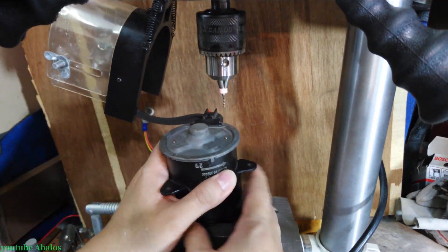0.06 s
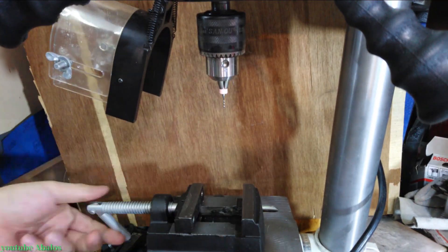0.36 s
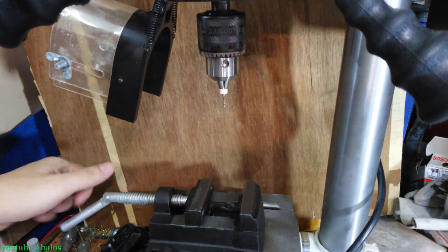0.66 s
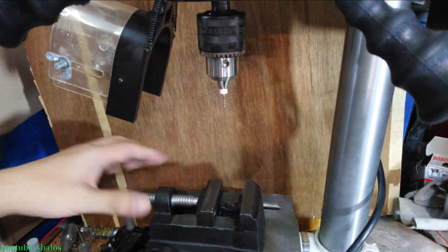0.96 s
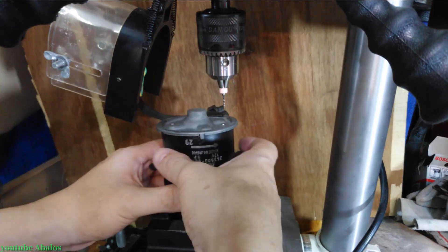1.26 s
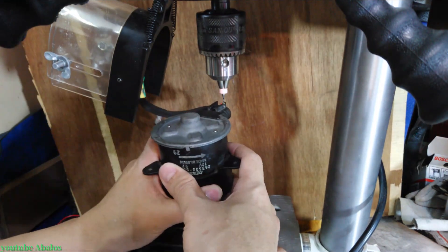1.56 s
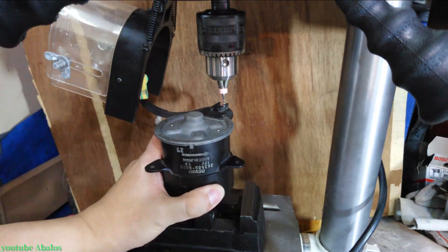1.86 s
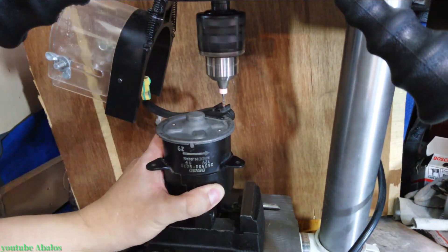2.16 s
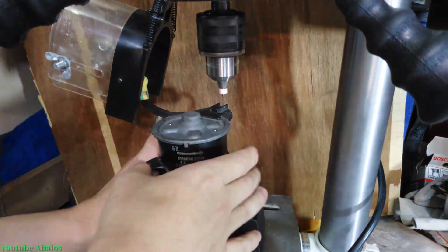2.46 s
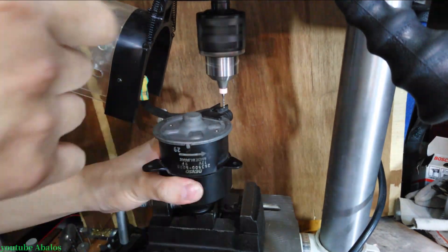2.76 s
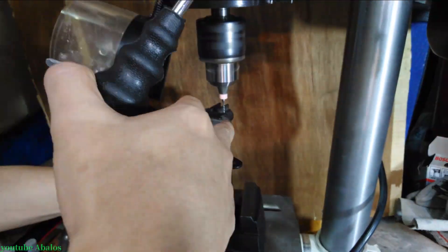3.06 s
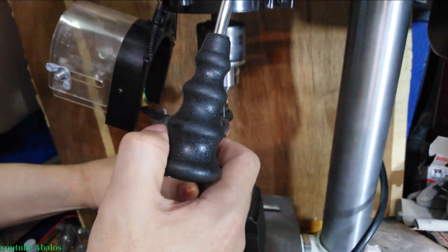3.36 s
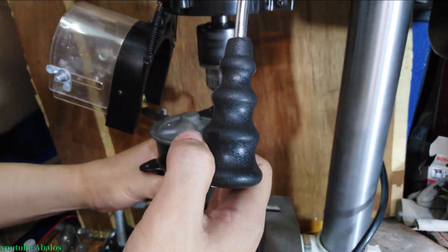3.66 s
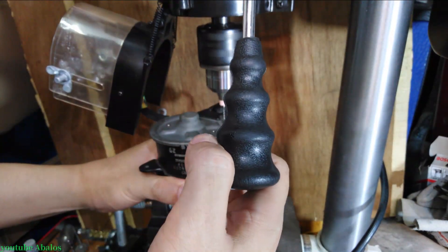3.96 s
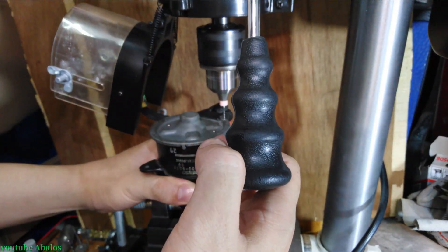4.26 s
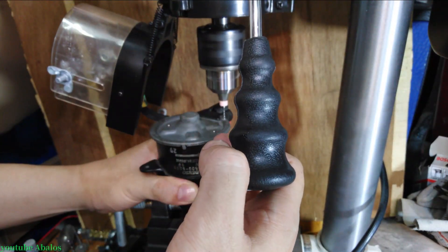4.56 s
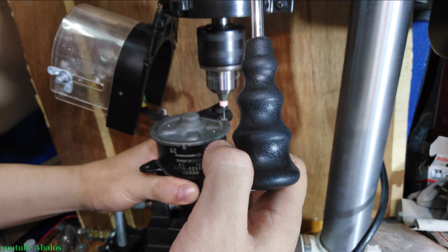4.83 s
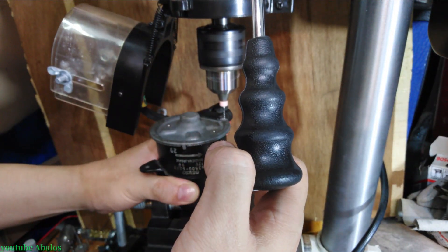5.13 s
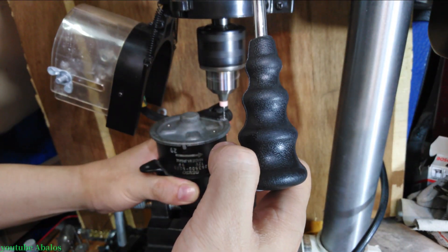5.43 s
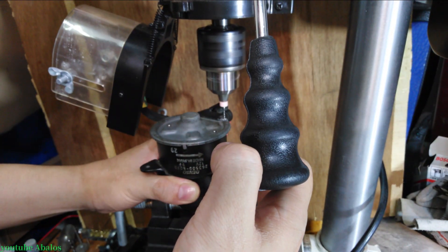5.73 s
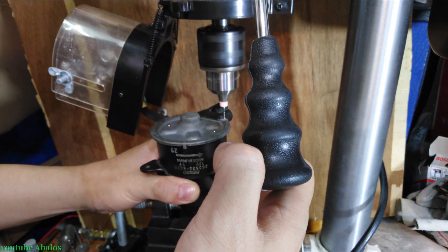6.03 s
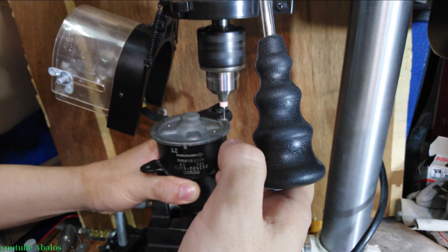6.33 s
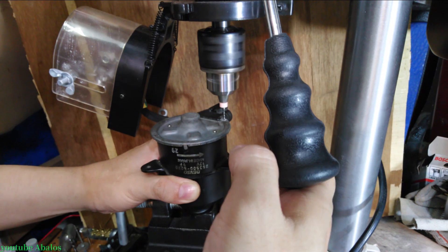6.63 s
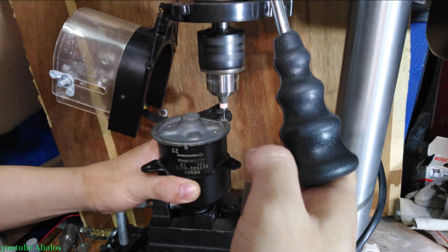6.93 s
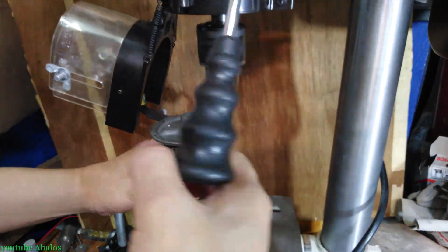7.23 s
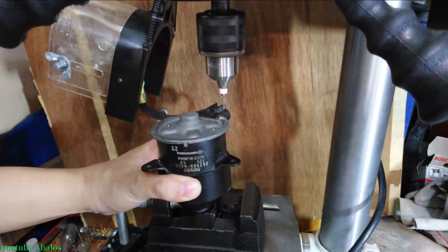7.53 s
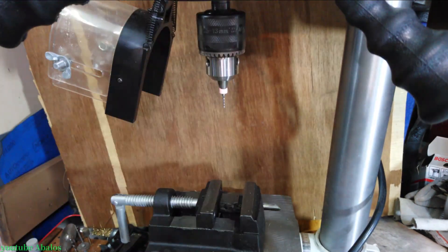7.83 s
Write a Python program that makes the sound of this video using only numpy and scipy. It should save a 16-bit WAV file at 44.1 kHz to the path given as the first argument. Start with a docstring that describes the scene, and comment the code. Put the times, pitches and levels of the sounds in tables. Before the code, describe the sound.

A cooling fan hums steadily over rushing air and a thin electrical whine in a small workshop, heard through a close stereo microphone. For the first 1.4 seconds, hands position a vice and a metal housing with light knocks, clicks and short scrapes, the strongest knock at about 0.6 seconds. At 2.2 seconds a bench drill press starts abruptly, its drive and gears whining while a loose spindle rattles. The bit grinds into the housing with a harsh, ringing chatter and a bright hiss, growing somewhat stronger as it goes. The cutting edge bites harder around 3.2 seconds and between 4.3 and 5.7. The bit catches briefly several times, loudest near 7.2 seconds, followed by a momentary dip. At about 7.6 seconds the switch clicks off and the gears brake with a quick, rough falling tone. The fan and thin whine remain until the end, around 8 seconds.

```python
"""A bench drill press, close to a stereo microphone in a small workshop. It starts with a whine of
drive and gears, rattles harshly while the bit grinds into a motor housing, catches a few times,
clicks off and brakes to a stop. Rubbing and a loose spindle ring its parts; the cutting edge hisses.
Beforehand, hands set the vice and housing in place with knocks and scrapes. Behind it all, a
cooling fan hums over rushing air and a thin electrical whine holds on."""
import sys
import numpy as np
from scipy import signal
from scipy.fft import rfft, irfft, next_fast_len
from scipy.io import wavfile
from scipy.ndimage import map_coordinates

SR = 44100
rng = np.random.default_rng(int(sys.argv[2]) if len(sys.argv) > 2 else 0)


def store_pcm(level_fs):
    """Save levels as 16-bit WAV."""
    pcm = np.round(np.clip(level_fs, -1, 1) * 32767).astype(np.int16)
    wavfile.write(sys.argv[1], SR, np.atleast_2d(pcm).T)


N = 356851
TIME, HZ = np.arange(N) / SR, np.fft.rfftfreq(N, 1 / SR)
START_S, DUCK_S, STOP_S = 2.19, 7.17, 7.578
SPINDLE_HZ, BEARING_HZ, WHINE_HZ = 41.687, 115.4, 750.37

# modes of the head (4 rows), bit and housing (2), chuck collar (2), cutting edge (3) and tip (4):
# f/Hz, width/Hz, level/dB
DRILL_MODES = [(1225, 273, -0.5), (1665, 230, 0), (1826, 220, 1), (2092, 203, 0), (2593, 250, -4.5),
               (2850, 300, -1), (3370, 95, -21), (3534, 560, -8), (4560, 630, -12), (5280, 1470, -11),
               (6980, 960, -16), (7910, 720, -12), (9750, 1450, -13.5), (12400, 3400, -16.5),
               (15300, 820, -17)]
# the drilling follows the load on the bit, and ducks briefly after the loudest catch: t/s, level/dB
DRILLING_LEVEL = [(2.25, -33), (2.38, -33), (2.81, -34), (3.0, -30), (3.71, -33.5), (3.83, -31),
                  (4.01, -33.5), (4.69, -29), (4.72, -32), (5.39, -29.5), (5.87, -33.5), (5.9, -31.5),
                  (6.69, -29.5), (7.13, -30), (7.16, -26), (7.19, -41.5), (7.29, -32), (7.56, -36.5)]
# the cutting edge bites harder: t/s, length/s, level/dB
EDGE_BITES = [(3.04, 0.11, -39), (3.17, .09, -34.5), (3.32, 0.097, -34), (4.28, 0.1, -39),
              (4.52, 0.088, -32.5), (4.67, 0.27, -40), (5.18, 0.17, -34.5), (5.4, 0.061, -34.5),
              (5.72, 0.092, -34), (6.73, .07, -46)]
# the bit catches: t/s, length/s, level/dB
BIT_CATCHES = [(2.895, .014, -29), (4.52, .012, -30), (4.705, .02, -29), (5.503, .012, -25),
               (6.967, .01, -28), (7.063, .012, -27), (7.16, .022, -22), (7.29, .02, -28)]
# ring of the loose spindle: f/Hz, level/dB, t60/s
SPINDLE_MODES = [(1190, -2, .04), (1255, -5, .035), (1680, -5, .03), (1905, 0, .036)]
# tones of the drive under power: multiple of WHINE_HZ, level/dB
WHINE_HARMONICS = [(1, -32), (2, -38), (3, -41), (4, -44.5), (6, -46), (10, -52.5)]
# tones of the gearing: multiple of SPINDLE_HZ, level/dB
GEAR_TONES = [(26, -53), (28, -45), (29, -46), (30, -45), (31, -52), (39, -50), (40, -49), (43, -49),
              (44, -51), (45, -44), (46, -47), (47, -48), (50, -51), (71, -53), (80, -52), (81, -45),
              (82, -49), (83, -50), (86, -50), (90, -48)]
# thin high tones of the motor: f/Hz, level/dB
MOTOR_TONES = [(6342, -60), (7093, -54), (7253, -57), (7843, -48), (9344, -54), (10094, -52), (11595, -61),
               (12345, -55), (13846, -58)]
# the gears run down: t/s, f/Hz, level/dB
GEAR_FALL = [(7.585, 2700, -41), (7.61, 2400, -39), (7.65, 1800, -37), (7.685, 1300, -44), (7.75, 800, -60)]
# metal parts knock on the bench; last, the drill's switch clicks off:
# t/s, snap level/dB, snap f/Hz, snap t60/s, thud level/dB
KNOCKS_AND_CLICK = [(0.0494, -20.5, 3150, 0.028, -53), (.2415, -35, 9000, .008, -60),
                    (0.457, -26.5, 9000, .012, -55), (0.5162, -27, 9000, .01, -55),
                    (0.5622, -16, 10900, 0.0094, -15), (0.662, -24, 6040, 0.011, -45),
                    (.861, -26, 11000, .01, -55), (1.262, -27, 13000, .02, -70),
                    (1.385, -29, 5000, .012, -34), (7.571, -24.5, 7400, 0.03, -65)]
# ring of the vice: f/Hz, level/dB, t60/s
VICE_MODES = [(700, 0.5, 0.04), (1020, -8.5, 0.029), (1250, -1.5, 0.018), (1620, -6.5, 0.018),
              (2440, -5, 0.012), (2950, 0.5, 0.015), (6570, -22, .014), (8796, -22, .018)]
# the vice screw and fingers scrape: t/s, length/s, body level/dB, hiss level/dB
SCRAPE_STROKES = [(0.134, 0.088, -45, -48), (0.467, 0.12, -39.5, -45), (0.521, .05, -35.5, -38),
                  (0.557, 0.017, -32, -46), (0.665, 0.11, -39.5, -57), (0.802, .125, -38.5, -44),
                  (0.875, 0.062, -40, -40), (.93, 0.083, -38, -42), (1.003, 0.078, -38, -44),
                  (1.272, 0.034, -65, -42), (1.373, 0.037, -62, -37)]
# spectra of a scrape's body and hiss: f/Hz, level/dB
SCRAPE_BODY_SPECTRUM = [(300, -25), (900, 0), (1600, 6.5), (3000, 2.5), (4000, -10), (6000, -2.5),
                        (9000, -21), (16000, -30)]
SCRAPE_HISS_SPECTRUM = [(2000, -21), (6000, -10), (8500, -5.5), (12000, -2.5), (16000, -18)]
# the fan's main tones, weaker tones and casing modes: f/Hz, width/Hz, level/dB
BLADE_TONES = [(422.1, 5, -43.5), (415.5, 0.62, -51.5), (628.3, 11, -38.5)]
WEAK_FAN_TONES = [(502.6, 35, -51.5), (563, 15, -48.5), (655, 30, -44.5), (843, 9, -55.5), (979, 30, -66.5),
                  (1274, 15, -52.5)]
CASING_MODES = [(2190, 42, -0.5), (2940, 22, -5), (3044, 48, 2), (3980, 140, 0), (4600, 160, 0.5),
                (5130, 280, -10)]
# the fan's rush of air: f/Hz, level/dB
AIR_SPECTRUM = [(30, -31), (130, -31.5), (250, -24), (390, -3.5), (660, -4), (860, -11), (1250, -8.5),
                (1600, -17), (2400, -19), (3600, -16.5), (4700, -15), (5900, -19), (9000, -21.5),
                (15800, -24.5)]
# stereo width at the microphone: f/Hz, side minus mid/dB
MIC_WIDTH = [(150, -4), (380, -20), (700, -22.5), (1300, -14.5), (2400, -14.5), (4400, -4), (8000, -2.5),
             (15000, 2.5)]
# balance at the microphone: f/Hz, left minus right/dB
MIC_BALANCE = [(500, -0.5), (1000, 0.2), (2500, 2.5), (8000, 0.83), (12000, 0)]


def drilling(deepen_db_per_s=0.88, soften_db=1, rattle_follow=0.098, hiss_follow=0.41):
    """Close up, gear contacts ring the head and chuck; the cut rings bit and housing and hisses."""
    head, bit, collar = DRILL_MODES[:4], DRILL_MODES[4:6], DRILL_MODES[6:8]
    edge, tip = DRILL_MODES[8:11], DRILL_MODES[11:]
    swing_db = drilling_swing_db()
    rub = rubbing(depth_db=1.0, jolt_db=1.5, grit_per_s=1800, grit_db=2.5, grit_share=0.29)
    cut = rubbing(depth_db=2.0, jolt_db=1.06, grit_per_s=1400, grit_db=5.5, grit_share=0.36)
    grind = 0.5 * rub + cut
    shaken_rub = rub * (1 + 0.45 * bearing_jolts(decay_s=0.0015))
    rattle = colour(shaken_rub, resonances(head)) + 0.66 * spindle_clatter()
    rattle *= amp(-32 + rattle_follow * swing_db + 0.5 * drift(12))
    # the chatter grows as the hole deepens and is slightly softer after the duck
    chatter_db = swing_db + deepen_db_per_s * (TIME - START_S) - soften_db * (TIME > DUCK_S)
    chatter = amp(-37.5 + chatter_db) * colour(rub, resonances(bit))
    chuck = amp(-38.5 + swing_db / 2) * colour(rub, resonances(collar))
    cutting = amp(-38 + swing_db) * colour(grind, resonances(edge))
    hiss = amp(-41 + hiss_follow * swing_db) * colour(grind, resonances(tip))
    bites = amp(-0.5) * swells(EDGE_BITES) * colour(noise(), resonances(edge[:2]))
    catches = swells(BIT_CATCHES) * colour(noise(), resonances(DRILL_MODES[1:]))
    body = (rattle + chatter + chuck) * powered(coast_s=0.1)
    treble = (cutting + hiss) * powered(coast_s=0.21)
    return body + treble + bites + catches + bearing_ticks(swing_db)


def drilling_swing_db(unsteady_db=0.46):
    """Drilling level around its usual value; the hand on the feed lever is never quite steady."""
    s, db = np.transpose(DRILLING_LEVEL)
    return np.interp(TIME, s, db - np.median(db)) + unsteady_db * drift(9)


def rubbing(depth_db, jolt_db, grit_per_s, grit_db, grit_share, spot_count=22):
    """Metal rubs over the same high spots every turn, with sharp grains of grit on top."""
    spots = unit(rng.standard_normal(spot_count))
    profile = np.interp(TIME * SPINDLE_HZ, np.arange(spot_count) / spot_count, spots, period=1)
    pressure = amp(depth_db * profile + jolt_db * drift(260))
    grains = (rng.random(N) < grit_per_s / SR) * amp(grit_db * np.minimum(rng.exponential(1, N), 4))
    grit = unit(grains * rng.choice([-1, 1], (2, N)))
    return pressure * (np.sqrt(1 - grit_share) * noise() + np.sqrt(grit_share) * grit)


def spindle_clatter(spread_db=5.0, limp_db=4.0, jitter_s=0.001203):
    """The loose spindle knocks once a turn, harder every second turn, ringing its modes unevenly."""
    turns, t = np.arange(int(TIME[-1] * SPINDLE_HZ)), np.arange(4000) / SR
    out = np.zeros(N)
    for hz, db, t60 in SPINDLE_MODES:
        s = (turns + rng.random()) / SPINDLE_HZ + jitter_s * rng.standard_normal(len(turns))
        force_db = limp_db * (turns % 2) + spread_db * rng.standard_normal(len(s)).clip(-1, 1)
        blows = np.bincount(np.clip(s * SR, 0, N - 1).astype(int), amp(force_db), N)
        ring = amp(db - 60 * t / t60) * (1 - np.exp(-t / 0.0038)) * np.sin(2 * np.pi * hz * t)
        out += signal.oaconvolve(blows, ring)[:N]
    return unit(out) * amp([[1], [-1]])  # a little left of centre


def bearing_ticks(swing_db, ring_hz=10050, width_hz=1500):
    """A bearing ticks quickly and brightly, quieter as the drilling gets louder."""
    level_db = -49 - 0.71 * np.clip(swing_db, -3, 3)
    ticks = colour(bearing_jolts(decay_s=0.0019) * noise(), resonances([(ring_hz, width_hz, 0)]))
    return amp(level_db) * powered(coast_s=0.01) * ticks


def bearing_jolts(decay_s):
    """A jolt that dies away, once for each ball that passes the bearing's flaw."""
    return unit(np.exp(-(TIME % (1 / BEARING_HZ)) / decay_s))


def drive(idle_db=-41, shimmer_db=1.5, slip_turns=0.0022):
    """Under power the whine swells and gains overtones, gears sound with the spindle, the motor sings."""
    on = powered(coast_s=0.012)
    spindle_turns = SPINDLE_HZ * TIME + slip_turns * drift(13)
    whine_turns = spindle_turns * WHINE_HZ / SPINDLE_HZ
    whine_gain = amp(idle_db) * (1 - on) + amp(WHINE_HARMONICS[0][1]) * on
    out = tone(whine_turns, WHINE_HZ, whine_gain * amp(0.4 * drift(21)))
    for k, db in WHINE_HARMONICS[1:]:
        flutter_db = shimmer_db * (drift(8) + 0.27 * k * drift(150))  # high overtones are rougher
        out += tone(k * whine_turns, k * WHINE_HZ, on * amp(db + flutter_db))
    for k, db in GEAR_TONES:
        out += tone(k * spindle_turns, k * SPINDLE_HZ, on * amp(db + shimmer_db * drift(6)))
    for hz, db in MOTOR_TONES:
        out += tone(hz * TIME + 0.049 * drift(25), hz, on * amp(db + 2.5 * drift(70)))
    return out


def powered(coast_s, coast_db=-7):
    """Gain of 1 while the drill runs; it drops at switch-off and dies away as the spindle slows."""
    spin_up = np.clip((TIME - START_S) / 0.014 + 0.5, 0, 1)
    switch_off = np.clip((STOP_S - TIME) / 0.005 + 0.5, 0, 1)
    coasting = amp(coast_db) * np.exp(-np.maximum(TIME - STOP_S, 0) / coast_s)
    return spin_up * np.maximum(switch_off, coasting)


def gear_run_down(waver_hz=160, flutter_db=3.5):
    """A rough, broken gear tone falls as the spindle brakes."""
    s, hz, db = np.transpose(GEAR_FALL)
    turns = np.cumsum(np.interp(TIME, s, hz) + waver_hz * drift(300)) / SR
    level_db = np.interp(TIME, s, db, left=-120, right=-120) + flutter_db * drift(120)
    return tone(turns, hz.mean(), amp(level_db))


def knocks(thud_lag_s=0.00145, low_cut_hz=400):
    """Metal parts knock and, last, the switch clicks off: a bright snap, then the heavy vice answers."""
    out, t = np.zeros((2, N)), np.arange(4000) / SR
    late = np.maximum(t - thud_lag_s, 0)
    # neighbouring modes swing in opposite directions
    ring = sum((-1) ** k * amp(db - 60 * late / t60) * np.sin(2 * np.pi * hz * late)
               for k, (hz, db, t60) in enumerate(VICE_MODES))
    first_touch = 0.64 + np.exp(-t / 0.00037)
    for s, snap_db, hz, t60, thud_db in KNOCKS_AND_CLICK:
        white = rng.standard_normal((2, len(t)))
        band = signal.lfilter(*signal.iirpeak(hz, Q=2.2, fs=SR), white)
        mid, side = unit(band + 0.31 * white) * amp(snap_db - 60 * t / t60) * first_touch
        snap = np.array([mid + 0.34 * side, mid - 1.3 * side])
        at = round(s * SR)
        out[:, at:at + len(t)] += snap + amp(thud_db) * ring
    # the microphone's low cut thins the knocks' bass
    return signal.sosfilt(signal.butter(4, low_cut_hz, "high", fs=SR, output="sos"), out)


def scrapes(stick_db=2.5, snags_per_s=260, snag_db=-1):
    """At the bench, the vice screw and fingers stick and slip in short strokes."""
    s, length, body_db, hiss_db = np.transpose(SCRAPE_STROKES)
    snags = (rng.random(N) < snags_per_s / SR) * noise()
    slips = noise() * amp(stick_db * drift(500)) + amp(snag_db) * unit(snags)
    body = swells(zip(s, length, body_db)) * colour(slips, gain_at(SCRAPE_BODY_SPECTRUM, HZ))
    hiss = swells(zip(s, length, hiss_db)) * colour(slips, gain_at(SCRAPE_HISS_SPECTRUM, HZ))
    return body + hiss


def fan(air_db=-40, casing_db=-53, flutter_db=3.5):
    """In the background, blade tones waver over rushing air; the wider a tone, the faster it flutters."""
    out = amp(air_db) * colour(noise(), gain_at(AIR_SPECTRUM, HZ))
    out += amp(casing_db) * colour(noise(), resonances(CASING_MODES))
    gains = [turbulence(2.2 * width) for hz, width, db in BLADE_TONES]
    gains += [unit(amp(flutter_db * drift(2 * width))) for hz, width, db in WEAK_FAN_TONES]
    for (hz, width, db), gain in zip(BLADE_TONES + WEAK_FAN_TONES, gains):
        turns = np.cumsum(hz + 0.5 * width * drift(2 * width)) / SR
        out += tone(turns, hz, amp(db) * gain)
    return out


def turbulence(per_s, steady_share=0.48):
    """Gain of a tone in turbulent air: a steady part plus one that swells and cancels at random."""
    eddies = drift(per_s) + 1j * drift(per_s)
    return unit(abs(np.sqrt(steady_share) + np.sqrt((1 - steady_share) / 2) * eddies))


def colour(excitation, gain):
    """Filters a mid and side pair to a spectrum; gives left and right at the microphone, mid at rms 1."""
    size = next_fast_len(N)
    hz = np.fft.rfftfreq(size, 1 / SR)
    mid, side = rfft(excitation, size) * np.interp(hz, HZ, gain)
    pair = irfft(microphone(mid, side, hz), size)[:, :N]
    return pair / (pair.mean(0).std() + 1e-12)


def tone(turns, hz, gain):
    """A sine that reaches the two microphone ports out of step."""
    angle = 2 * np.pi * ((turns + rng.random()) % 1).astype(np.float32)
    return np.sqrt(2) * gain * microphone(np.sin(angle), np.cos(angle) * rng.choice([-1, 1]), hz)


def microphone(mid, side, hz):
    """Left and right ports; width and balance vary with frequency."""
    side, lean = side * gain_at(MIC_WIDTH, hz), np.sqrt(gain_at(MIC_BALANCE, hz))
    return np.array([(mid + side) * lean, (mid - side) / lean])


def resonances(modes):
    """Gain of a set of steep-sided resonances."""
    return np.sqrt(sum(amp(db) ** 2 / (1 + (2 * (HZ - hz) / width) ** 2) ** 2 for hz, width, db in modes))


def swells(rows):
    """One smooth rise and fall centred on each row's time: t/s, length/s, level/dB."""
    return sum(amp(db) * np.cos(np.pi * np.clip((TIME - s) / length, -0.5, 0.5)) ** 2
               for s, length, db in rows)


def drift(per_s):
    """Smooth random motion of rms 1 with about `per_s` new values a second."""
    coarse = map_coordinates(rng.standard_normal(4096), [TIME[::32] * per_s], order=3, mode="wrap")
    return unit(np.interp(TIME, TIME[::32], coarse))


def gain_at(spectrum, hz):
    """Gain of a dB spectrum, read on a log-frequency axis."""
    f, db = np.transpose(spectrum)
    return amp(np.interp(np.log(hz + 1), np.log(f), db))


def noise():
    """Two unrelated white noises."""
    return rng.standard_normal((2, N))


def amp(db):
    """Decibels to gain."""
    return 10 ** (np.asarray(db) / 20)


def unit(x):
    """Scales to rms 1."""
    return x / np.sqrt(np.mean(x ** 2) + 1e-20)


def scene():
    """The workshop from beside the bench: fan, drill and handled metal."""
    return fan() + drive() + drilling() + gear_run_down() + knocks() + scrapes()


def record(dry):
    """The recorder's band ends at 15850 Hz."""
    low_pass = signal.firwin(511, 15850, window=("kaiser", 9), fs=SR)
    return signal.oaconvolve(dry, low_pass[None], "same")


dry = scene()
out = record(dry)
store_pcm(out)
```